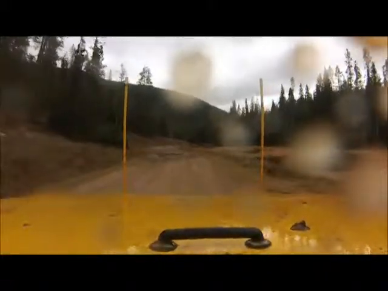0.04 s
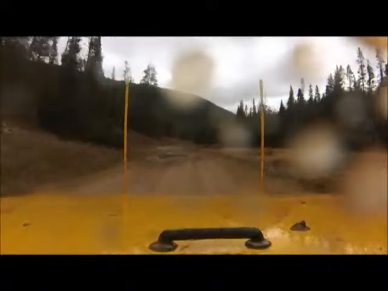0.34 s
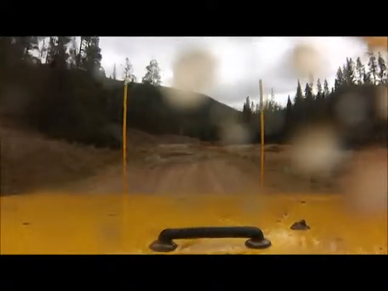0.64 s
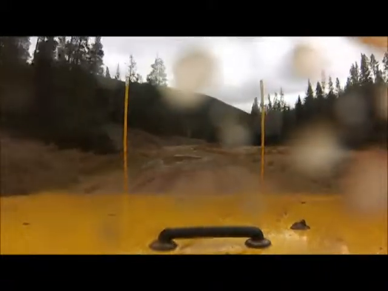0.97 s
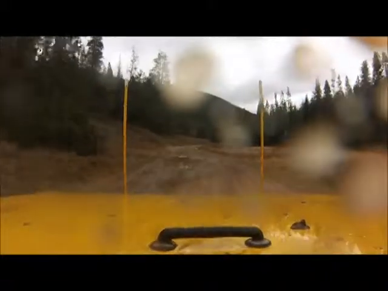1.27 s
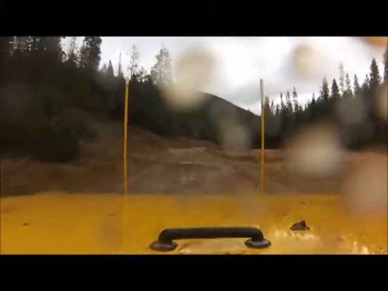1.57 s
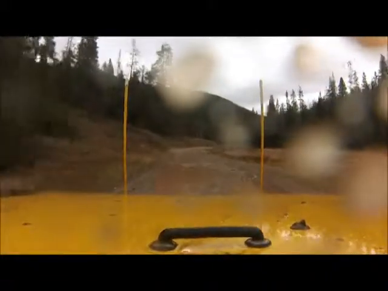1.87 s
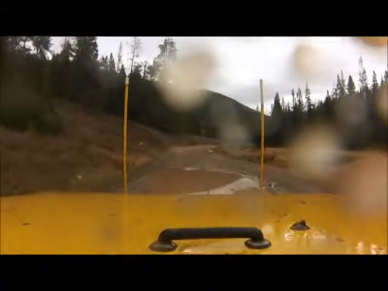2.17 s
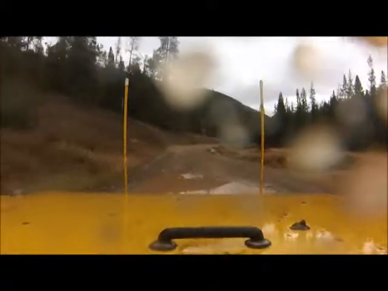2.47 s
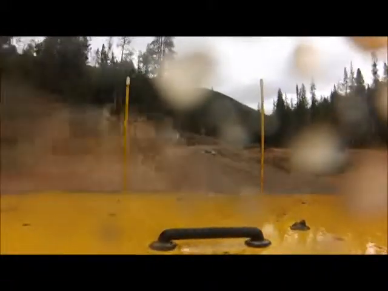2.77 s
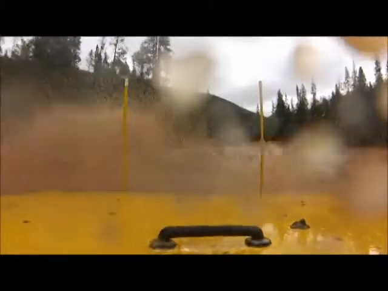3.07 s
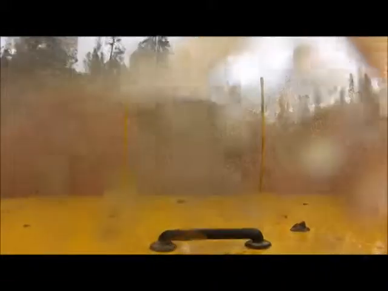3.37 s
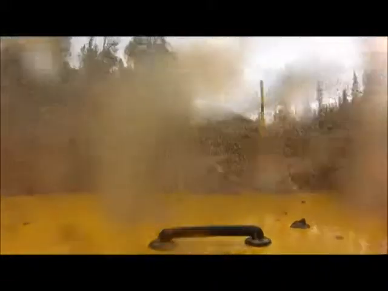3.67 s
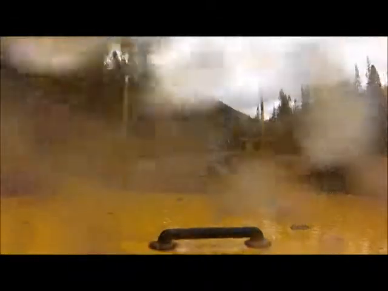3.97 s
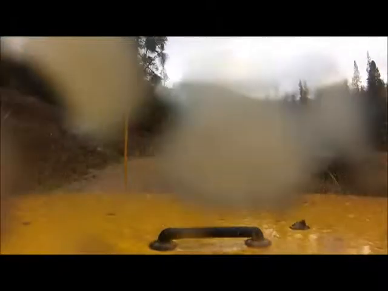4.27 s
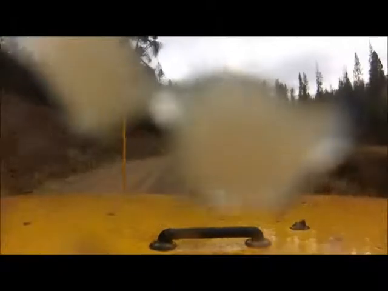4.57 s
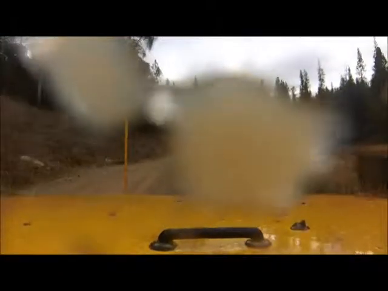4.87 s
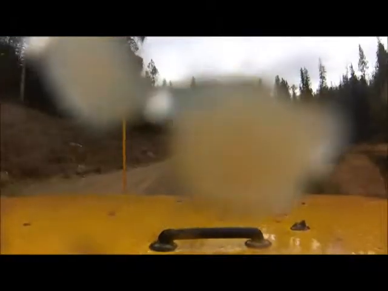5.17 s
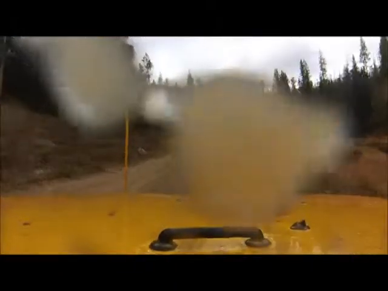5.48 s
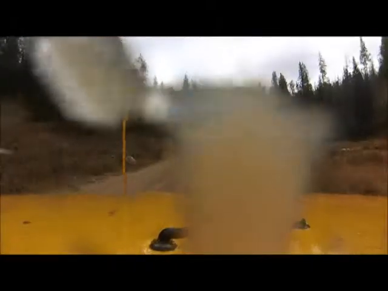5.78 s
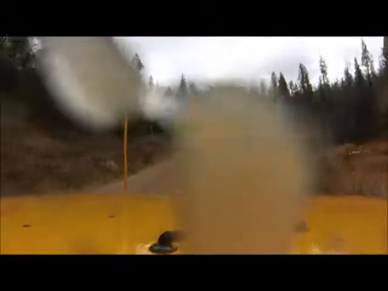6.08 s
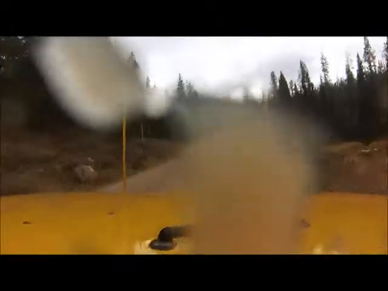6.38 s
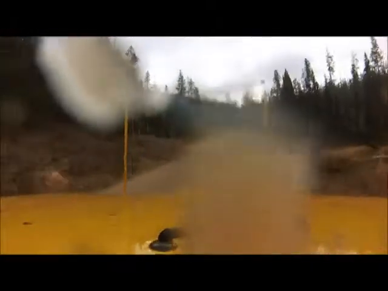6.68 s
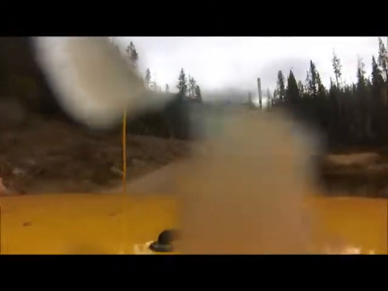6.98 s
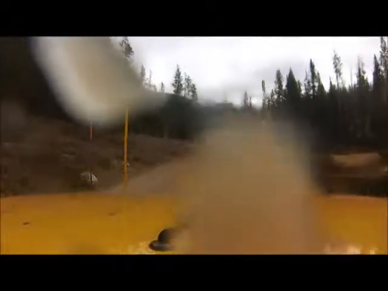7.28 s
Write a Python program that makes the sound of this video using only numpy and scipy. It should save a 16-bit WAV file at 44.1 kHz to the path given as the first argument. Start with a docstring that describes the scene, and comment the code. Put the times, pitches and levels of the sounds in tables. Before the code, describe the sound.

An off-road vehicle rumbles and rattles along a dirt road, with muddy water spraying and ticking right against the microphone.

```python
"""A wet dirt road, heard from a cased camera on the hood of an off-road vehicle driving through a puddle.
Right under the microphone the hood shakes at about 26 Hz, and a loose fitting knocks on it at the bumps.
Further off the engine drones under load, tyres rumble and crunch, and ruts make the body boom.
Closest of all, grit and drops tick on the hollow case, muddy spray washes over it and air buffets it."""
import sys
import numpy as np
from scipy import signal
from scipy.fft import rfft, irfft, next_fast_len
from scipy.io import wavfile
from scipy.ndimage import uniform_filter1d

SR = 44100
rng = np.random.default_rng(int(sys.argv[2]) if len(sys.argv) > 2 else 0)


def bounce(signal):
    """Save signal as a 16-bit WAV file at the path given by the first command-line argument."""
    frames = np.transpose(np.atleast_2d(signal))
    limited = np.clip(frames, -1, 1)
    pcm = np.round(limited * 32767).astype(np.int16)
    wavfile.write(sys.argv[1], SR, pcm)


N = 328093  # 7.44 s; table levels are relative, and each source sets its own gain


# The hood swinging right under the microphone: (time [s], rate [Hz], level [dB])
HOOD_SWING = [(0, 27.16, -15), (1.5, 27.19, -15.5), (2.7, 27.72, -15.5), (2.9, 25.41, -15.5),
              (3.4, 26.34, -14.5), (4.1, 26.37, -15.5), (4.35, 21.9, -20), (4.55, 24.05, -14.5),
              (5.35, 25.95, -14.5), (5.95, 24.63, -17), (6.2, 26.5, -14.5), (6.75, 25.05, -17),
              (7.44, 25.85, -15)]
def hood_shake(level_db=1.5, overtone_db=-33, rough_road_db=-41, calm_sway=0.04183, rough_sway=0.1682):
    """The hood swings lopsidedly on its lowest mode; rough ground upsets its pace and checks its swing."""
    ground = np.sqrt(gain_of(follow(ROAD_ROUGHNESS)) ** 2 + swells(ROAD_RUTS))
    upset = np.tanh(ground / gain_of(rough_road_db))
    hz = follow(HOOD_SWING) * (1 + (calm_sway + rough_sway * upset ** 2) * wander(12.46))
    dips_db = np.minimum((5 + 0.5 * upset) * np.maximum(wander(10.7), 0) ** 2, 6)  # brief, 6 dB at most
    angle = 2 * np.pi * np.cumsum(hz) / SR
    swing = np.sin(angle) + gain_of(overtone_db) * (np.cos(2 * angle) + np.sin(3 * angle))
    return np.sqrt(2) * gain_of(follow(HOOD_SWING, column=2) + level_db - dips_db) * swing


# The panel the camera sits on, its strong modes: (frequency [Hz], level [dB], t60 [s])
PANEL_MODES = [(443, -30, 0.084), (679, -9.5, 0.11), (748, -10.5, 0.13), (834, -7, 0.12), (960, -10, 0.19),
               (1153, -11, 0.19), (1335.6, 6, 0.056), (1442, 5, 0.061), (1488, -1.5, 0.08),
               (1603, 0, 0.084), (1621, -5.5, 0.036), (1908, 2, 0.037), (1940, -6, 0.08),
               (1985, -22, 0.046), (2390, -12, 0.019), (3200, -6.5, 0.04), (3650, -17.5, 0.11),
               (4850, -11, 0.028), (5380, -11, 0.052)]
# Its dense, weaker modes: (frequency [Hz], level [dB])
PANEL_RING = [(100, -41.5), (220, -6.5), (400, 1.5), (600, 1), (1000, 7.5), (1500, -4.5), (2300, 4),
              (2750, -10), (3400, -6), (4400, -18.5), (5400, -13.5), (6200, -25.5), (11000, -28.5),
              (16000, -38)]
def struck_hood(size, spread_db=2.2, detune_per_khz=.0065, ring_db=-6, ring_s=0.012, treble_s=0.0084):
    """The hood rings after a blow, its modes a little different in strength and pitch each time."""
    t, hz = np.arange(size) / SR, np.fft.rfftfreq(size, 1 / SR)
    modes = np.zeros(size)
    for mode_hz, db, t60 in PANEL_MODES:
        pitch = mode_hz * (1 + detune_per_khz * mode_hz / 1000 * rng.standard_normal())
        decay = gain_of(db + spread_db * rng.standard_normal() - 60 * t / t60)
        modes += decay * np.sin(2 * np.pi * pitch * t)
    dense = coloured(rng.standard_normal(size), PANEL_RING)
    treble = irfft(rfft(dense) * (hz > 6000), size)
    ring = (dense - treble) * np.exp(-t / ring_s) + 1.3 * treble * np.exp(-t / treble_s)
    # the direct wave arrives as a hard clack before the panel rings on
    rise = 1 - np.exp(-(t / 0.00048) ** 2)
    clack = 1 + 0.59 * np.exp(-t / 0.00069)
    return (unit_rms(modes) + gain_of(ring_db) * unit_rms(ring)) * rise * clack


def contact_force(size, chatter=0.47, chatter_s=0.017, chatter_per_s=900, graze=0.19, graze_s=.0035):
    """One edge of the fitting grazes the metal, the full blow lands, and a soft chatter follows."""
    t = np.arange(size) / SR
    force = rng.standard_normal(size) * (rng.random(size) < chatter_per_s / SR) * np.exp(-t / chatter_s)
    force *= chatter / (np.linalg.norm(force) + 1e-9)
    force = signal.sosfilt(signal.butter(2, 2600, fs=SR, output="sos"), force)
    force[0] = 1  # the blow
    force[-round(graze_s * rng.uniform(.7, 1.5) * SR)] = graze  # wraps round to just before the blow
    return force


def knock(hardness_db, clang_db, lead_s=.012, travel_s=0.00515, size=8192):
    """One knock travels through the hood to the microphone; the blow lands about lead_s into the sound."""
    hz = np.fft.rfftfreq(size, 1 / SR)
    spectrum = rfft(struck_hood(size)) * rfft(contact_force(size))
    # a harder contact is brighter; where it lands decides how much the upper modes clang
    colour_db = hardness_db * spectrum_db([(2400, 0.1), (3200, 1.0)], hz)
    colour_db += clang_db * spectrum_db([(1400, 0.061), (2000, 0.93), (2400, 0.97), (3200, 0.0)], hz)
    # bending waves carry the treble faster than the bass
    lag_turns = travel_s * (2 * np.sqrt(1400 * hz) - hz) + hz * lead_s
    sound = irfft(spectrum * gain_of(colour_db) * np.exp(-2j * np.pi * lag_turns), size)
    return sound / np.sqrt(uniform_filter1d(sound ** 2, size=100).max())


# The loose fitting, close by on the hood: (time [s], level [dB], hardness [dB], clang near 2.2 kHz [dB])
FITTING_KNOCKS = [(0.0179, -23, -2, -6), (0.1154, -33.5, -11, 1), (0.2009, -31, -9, -2),
                  (0.2464, -34, -13, -3), (0.302, -28, -7.5, -4.5), (0.404, -32.5, -8, -2),
                  (0.5162, -31, 1.5, 1), (0.6175, -30, -7.5, -2), (0.6869, -27.5, -4.5, -1),
                  (0.7767, -37.5, -1, -3), (0.8658, -38, -9, -9), (0.9537, -30.5, -5, 0),
                  (1.0455, -36.5, -11, -2), (1.1078, -34, -8, -3), (1.3127, -40.5, -9, 0),
                  (1.3658, -38.5, -15, -1), (1.925, -35, -9, 0), (1.9918, -28.5, -17, -7),
                  (2.0379, -32, -3.5, 0), (2.1634, -24, -8.5, -2), (2.2553, -37.5, -6, 1),
                  (2.3329, -36.5, -10, -5), (2.5135, -29.5, -4, -2), (2.601, -29.5, -11, -7),
                  (2.6369, -27.5, -4, 6), (2.7761, -29.5, -4, 4), (2.8566, -28.5, -1, -4),
                  (2.8935, -33, -7, -2), (2.9185, -34, -4, 0), (2.9401, -25, -5, -3), (2.9635, -34, -6, -2),
                  (3.076, -32.5, 11, 12), (3.2186, -36, 0.5, 1), (3.2913, -35, -2, 3),
                  (3.3992, -37, -1, -4), (3.4895, -38, -9, 1), (3.7033, -32.5, -3, -5),
                  (3.7753, -34, -4, -2), (3.8512, -35, -9, -10), (4.4229, -20.5, -0.5, -1.5),
                  (4.4353, -28.5, 2, 2), (4.504, -26, -2.5, 1), (4.6885, -32, -11, -9),
                  (4.7537, -25.5, -9, -5), (4.945, -41, -14, -8), (5.03, -40.5, -14, -8),
                  (5.153, -40, -3, -3), (5.4948, -33.5, -9, -4), (5.5542, -39, -9, 1),
                  (5.6042, -31, -8, -5), (5.6321, -15.5, 1, 9), (5.6508, -28, -11, -3),
                  (5.6896, -26.5, 0.5, 0), (5.7339, -26, -3, 6), (5.7713, -28.5, -6, 0),
                  (5.7979, -30, 1, 6), (5.9582, -29, -6, -2), (6.0466, -25, 2.5, 6), (6.0921, -30, -2, 1),
                  (6.2721, -38, -5, -4), (6.3245, -33.5, -1, 7), (6.3812, -36.5, 2.5, 2),
                  (6.4524, -37, 0.5, -5), (6.5299, -36, 1.5, 5), (6.6089, -34, -2, -3),
                  (6.6716, -29, 2.5, 2), (6.7435, -26, 1.5, 1), (6.78, -31, -4, -2),
                  (6.8257, -27.5, 3.5, 0), (6.9114, -28.5, -1, -3), (6.9939, -24, -2.5, 1.5),
                  (7.0195, -36, -3, -2), (7.0913, -31.5, -0.5, 4.5), (7.2343, -34.5, -12, -9),
                  (7.2543, -35.5, -3, 0.5), (7.3741, -40.5, 4, 1)]
# The body's dull answer from below: (frequency [Hz], level [dB])
THUD_SPECTRUM = [(100, -22.5), (165, -4), (210, 6), (250, -1.5), (320, -15), (480, -7.5), (700, -22),
                 (2000, -53)]
def rattle(level_db=-1, thud_db=-25, thud_share=0.54, thud_lag_s=.024, lead_s=.012, faint_taps=14):
    """The loose fitting knocks and the body thuds after it; faint chance taps fall between."""
    out = np.zeros(N)
    for s, db, hardness_db, clang_db in FITTING_KNOCKS:
        add(out, s - lead_s, gain_of(db + level_db) * knock(hardness_db, clang_db, lead_s))
        thud = body_thud(THUD_SPECTRUM, rise_s=0.0043, decay_s=0.031)
        add(out, s + thud_lag_s, gain_of(thud_share * db + thud_db) * thud)
    road_db = follow(ROAD_ROUGHNESS)
    for at in rng.integers(0, N, faint_taps):
        tap_db = road_db[at] + 2 * rng.standard_normal()
        add(out, at / SR, gain_of(tap_db) * knock(hardness_db=-4, clang_db=0))
    return out


def body_thud(spectrum, rise_s, decay_s):
    """The body answers a blow with a short burst of low noise."""
    t = np.arange(SR // 4) / SR
    envelope = np.exp(-t / decay_s) * (1 - np.exp(-t / rise_s))
    return coloured(rng.standard_normal(len(t)), spectrum) * envelope


# Hard jolts of the suspension, felt at the microphone: (time [s], level [dB])
SUSPENSION_JOLTS = [(0.681, -24), (2.166, -22.5), (2.9, -35), (3.72, -26), (4.457, -16.5), (5.654, -17),
                    (5.973, -17.5), (6.116, -20.5), (7.042, -14)]
def jolts(level_db=2, width_s=0.00533, thud_db=-13):
    """Each hard jolt is one short push of pressure in the case, and the body thuds after it."""
    out, widths = np.zeros(N), np.arange(-4, 4, 1 / (width_s * SR))
    push = (2 * widths ** 2 - 1) * np.exp(-widths ** 2)
    for s, db in SUSPENSION_JOLTS:
        add(out, s - len(push) / 2 / SR, gain_of(db + level_db) * push)
        thud = body_thud(RUMBLE_SPECTRUM, rise_s=0.0091, decay_s=0.018)
        add(out, s - width_s, gain_of(db + thud_db) * thud)
    return out


# The engine's load, heard through the hood: (time [s], level [dB])
ENGINE_LOAD = [(0, -27.5), (0.23, -51.5), (1.2, -48), (2.3, -41), (2.5, -53), (2.7, -35), (2.93, -36.5),
               (3.07, -43), (3.26, -31.5), (3.58, -42.5), (3.88, -45), (4.06, -38.5), (4.25, -50.5),
               (4.5, -46.5), (5.52, -43.5), (5.67, -31.5), (5.9, -31), (6.15, -42), (6.42, -32.5),
               (6.6, -42), (7.17, -41.5), (7.44, -32)]
# Its crankshaft: (time [s], rate [turns/s])
CRANK_RATE = [(0, 30.6), (1.5, 26.7), (2.7, 30.4), (2.9, 27.6), (3.25, 26.8), (4.1, 26.3), (4.6, 26.3),
              (5.62, 28.8), (5.74, 26.1), (5.86, 27.9), (5.98, 25.7), (6.8, 26.2), (7.44, 26)]
# The tones of its drone: (order [multiple of crank rate], level [dB])
ENGINE_ORDERS = [(2, -0.5), (3, -2), (4, -2), (5, -3.5), (6, -19), (7, -28), (8, -34)]
# Single orders swelling out: (time [s], order [multiple of crank rate], level [dB], half length [s])
ORDER_HUMS = [(2.724, 4, -35, 0.036), (2.901, 4, -35, .06), (3.35, 4, -41, 0.084), (3.5, 3, -45, 0.16),
              (4.06, 3, -43.5, 0.079), (5.686, 4, -31, 0.056), (5.859, 4, -30.5, 0.075),
              (6.8, 7, -46.5, 0.16), (7.163, 7, -45.5, .06)]
def engine(level_db=1.0, rut_db=-6, surge_db=0.76, jitter=.008, roughness=.33, waver_db=2.2):
    """Low crankshaft orders drone raggedly, louder in each rut; single orders swell into a clean hum."""
    angle = 2 * np.pi * np.cumsum(follow(CRANK_RATE) * (1 + jitter * wander(14))) / SR
    drone, hum = np.zeros(N), np.zeros(N)
    for order, db in ENGINE_ORDERS:
        tone = np.exp(1j * (order * angle + 2 * np.pi * rng.random()))
        ragged = 1 + roughness * (wander(13) + 1j * wander(28))
        drone += gain_of(db + waver_db * wander(5.7)) * (ragged * tone).real
        hum_power = swells([(s, hum_db, half_s) for s, k, hum_db, half_s in ORDER_HUMS if k == order])
        hum += np.sqrt(2 * hum_power) * tone.real
    load = np.sqrt(gain_of(follow(ENGINE_LOAD)) ** 2 + gain_of(rut_db) ** 2 * swells(ROAD_RUTS))
    return load * gain_of(level_db) * unit_rms(drone * gain_of(surge_db * wander(21))) + hum


# Roughness of the dirt road, a wheel's height below the hood: (time [s], level [dB])
ROAD_ROUGHNESS = [(0, -45), (0.45, -51), (0.9, -49.5), (1.6, -51.5), (2.05, -49), (2.46, -53),
                  (2.58, -43.5), (3.25, -47), (4.1, -53.5), (4.4, -43), (4.62, -51), (5.45, -48),
                  (5.72, -38), (6.08, -46.5), (6.23, -59), (6.85, -36.5), (7.15, -48), (7.44, -53)]
# Wet gravel down at the tread: (time [s], level [dB])
WET_GRAVEL = [(0, -47), (0.12, -59.5), (1.2, -60), (1.6, -57), (1.8, -51.5), (2.12, -50.5), (2.45, -55.5),
              (2.72, -43.5), (2.9, -44), (3.03, -49), (3.28, -45.5), (3.46, -56), (4.12, -51.5),
              (4.33, -36), (4.54, -55), (4.9, -51.5), (5.2, -64.5), (5.42, -52.5), (5.73, -45.5),
              (6.15, -57.5), (6.38, -55), (6.84, -51.5), (7.15, -61), (7.44, -56)]
# Rumble and crunch as they reach the microphone: (frequency [Hz], level [dB])
RUMBLE_SPECTRUM = [(30, 3), (60, 5), (100, -3.5), (165, 1), (195, 3), (240, 3), (275, -4.5), (310, -2),
                   (380, -6.5), (455, -4.5), (580, -12), (850, -12.5), (1500, -22), (5000, -78)]
CRUNCH_SPECTRUM = [(400, -24), (750, -6.5), (1130, -5), (1390, 1.5), (1510, 1), (1640, -2), (1790, -4),
                   (2120, -1.5), (2700, -17), (3400, -21), (4400, -30.5), (5400, -28), (6500, -39),
                   (16000, -44.5)]
def tyres(rumble_db=1, crunch_db=1, lumpy_db=3.5, clump_db=2, drum_db=-6, road_share=0.37):
    """Lumps and ruts rumble through the body; gravel crunches under the tread and drums the underside."""
    rumble = coloured(rng.standard_normal(N) * gain_of(lumpy_db * wander(30)), RUMBLE_SPECTRUM)
    road_db, gravel_db = follow(ROAD_ROUGHNESS), follow(WET_GRAVEL)
    ground = np.sqrt(gain_of(road_db + rumble_db) ** 2 + swells(ROAD_RUTS))
    underside = signal.butter(2, [290, 750], "band", fs=SR, output="sos")
    drumming = unit_rms(signal.sosfilt(underside, coloured(rng.standard_normal(N), RUMBLE_SPECTRUM)))
    drumming = unit_rms(signal.sosfilt(underside, drumming[::-1])[::-1])  # back again, for steeper edges
    drumming *= gain_of(drum_db + road_share * road_db + (1 - road_share) * gravel_db)
    stones = grains(per_s=4400, spread_db=1.5) * gain_of(clump_db * wander(46))
    crunch = coloured(stones, CRUNCH_SPECTRUM)
    return ground * rumble + drumming + gain_of(gravel_db + crunch_db) * crunch


# Ruts passing under the wheels: (time [s], level [dB], half length [s])
ROAD_RUTS = [(0.012, -31.5, 0.062), (0.283, -42, 0.016), (0.341, -37, 0.016), (0.558, -41.5, 0.016),
             (0.66, -38.5, 0.025), (0.825, -42, 0.016), (0.994, -41.5, 0.012), (1.093, -41.5, 0.023),
             (1.395, -53.5, 0.022), (2.018, -45.5, 0.044), (2.193, -40.5, 0.013), (2.567, -41.5, 0.028),
             (2.909, -31, 0.022), (3.283, -41.5, 0.073), (3.825, -44.5, .06), (4.36, -39.5, 0.018),
             (4.456, -31, 0.017), (4.774, -39.5, 0.025), (5.665, -32, 0.029), (6.09, -31, 0.037),
             (6.373, -40, 0.04), (6.728, -35, .02), (6.796, -29, 0.02), (6.862, -39.5, 0.012),
             (7.017, -34.5, 0.01)]
# Low resonances of the body beneath the camera: (frequency [Hz], level [dB])
BODY_RESONANCES = [(193, 0), (241, 2), (308, -5.5)]
def body_boom(level_db=-3, width_hz=22, depth_share=0.71, pivot_db=-40):
    """Each rut sets the body booming on its low resonances."""
    t, ringing = np.arange(N) / SR, np.zeros(N)
    for hz, db in BODY_RESONANCES:
        envelope = wander(width_hz / 2) + 1j * wander(width_hz / 2)
        ringing += gain_of(db) * (envelope * np.exp(2j * np.pi * hz * t)).real
    power = swells([(s, pivot_db + depth_share * (db - pivot_db), half_s) for s, db, half_s in ROAD_RUTS])
    return gain_of(level_db) * np.sqrt(power) * unit_rms(ringing)


# The fitting rubbing on the hood, close by: (frequency [Hz], level [dB])
SCRAPE_SPECTRUM = [(500, -32), (850, -13), (1000, 4), (1120, 7), (1280, -13), (1460, 0), (1720, -3),
                   (1900, -11), (2200, -9), (2700, -37), (8000, -40)]
def scrape(at_s=7.255, level_db=-41.5, half_s=0.03):
    """The loose fitting judders briefly across the metal."""
    judder = coloured(grains(per_s=1100, spread_db=2.5), SCRAPE_SPECTRUM)
    return np.sqrt(swells([(at_s, level_db, half_s)])) * judder


# Muddy water thrown at the case, right at the microphone: (time [s], level [dB])
MUD_SPRAY = [(0, -75.5), (1.1, -77.5), (1.5, -73), (2.2, -72.5), (2.55, -77), (3.3, -67.5), (3.58, -57),
             (3.69, -49.5), (3.87, -59), (4.05, -59.5), (4.27, -58.5), (4.37, -50), (4.51, -59.5),
             (4.6, -72.5), (5.4, -75), (5.55, -69.5), (6.05, -70), (6.3, -79), (7.44, -75)]
# Its fizz from inside the case: (frequency [Hz], level [dB])
SPRAY_SPECTRUM = [(500, -34), (1500, 12.5), (2300, 11), (3300, 5.5), (4400, 2.5), (5400, 2), (7200, 0.5),
                  (8200, -14.5), (9200, -14), (11500, -7), (13000, -11.5), (15500, -17)]
def spray(level_db=5, coarse_db=-4.5, merge_db=-57, clump_db=2.3):
    """Droplets fizz on the case in clumps; coarser ones spit through thin spray and merge in thick."""
    droplets = grains(per_s=6000, spread_db=5) * gain_of(clump_db * wander(260))
    coarse = splats(grains(per_s=130, spread_db=1.5), splat_s=0.00028)
    wet_db = follow(MUD_SPRAY)
    fizz = gain_of(wet_db) * coloured(droplets, SPRAY_SPECTRUM)
    spit = gain_of(np.minimum(wet_db, merge_db) + coarse_db) * coloured(coarse, TICK_SPECTRUM)
    return gain_of(level_db) * (fizz + spit)


# The largest drops and stones, landing right at the microphone: (time [s], level [dB])
CASE_TICKS = [(0.035, -44), (0.077, -57), (0.102, -55), (0.1361, -62), (0.1461, -52.5), (0.189, -63),
              (0.2254, -67), (0.2922, -58), (0.3466, -52), (0.3564, -62), (0.3665, -52), (0.3863, -55),
              (0.4266, -52.5), (0.463, -55), (0.5007, -62), (0.678, -55), (0.6985, -56), (0.7136, -51),
              (0.7332, -58), (0.8097, -54), (0.846, -57), (0.905, -52), (0.9288, -59), (1.2568, -55),
              (1.3549, -57), (1.3725, -58), (1.3952, -58), (1.4342, -55), (1.4534, -55), (1.6168, -53.5),
              (1.6364, -57), (1.7943, -55), (1.8121, -52), (1.8305, -53.5), (1.938, -55), (2.0583, -52),
              (2.076, -51), (2.17, -46), (2.187, -54), (2.2247, -49.5), (2.2672, -60), (2.286, -52.5),
              (2.3425, -49), (2.383, -55), (2.4, -55), (2.4178, -52), (2.588, -55), (2.634, -59),
              (2.7235, -56), (2.7417, -51), (2.9851, -51), (3.007, -49), (4.002, -50), (4.195, -58),
              (4.252, -47), (4.292, -47), (4.3213, -45), (4.3603, -56), (4.373, -39.5), (4.4214, -39),
              (4.479, -41.5), (4.5036, -48), (4.5709, -59), (4.8306, -46), (4.8378, -54), (4.8578, -55),
              (4.8759, -50), (4.919, -54.5), (5.028, -51), (5.0484, -49), (5.0696, -56), (5.09, -64),
              (5.1435, -60), (5.3223, -54), (5.3349, -50), (5.3395, -57), (5.3774, -59), (5.9762, -46),
              (6.104, -53), (6.119, -50), (6.1456, -53), (6.164, -54), (6.2675, -56), (6.802, -53),
              (6.8666, -52), (7.0225, -57), (7.0311, -55), (7.0402, -43.5), (7.0447, -48), (7.362, -56),
              (7.3769, -51)]
# A tick from inside the hollow case: (frequency [Hz], level [dB])
TICK_SPECTRUM = [(200, -4), (600, 8), (2000, -10.5), (2700, -1), (3600, -0.5), (4200, -5), (5600, -5),
                 (8500, -11), (11500, -13.5), (14500, -23), (16000, -28.5)]
def ticks():
    """Large drops and stones crack on the case one by one."""
    return case_hits(CASE_TICKS, TICK_SPECTRUM, level_db=23, length_s=0.0053, fizz=0.12)


# Single drops of muddy water on the case: (time [s], level [dB])
MUD_DROPS = [(3.1462, -56), (3.1792, -50), (3.2451, -46), (3.266, -49), (3.311, -49), (3.3647, -60),
             (3.39, -52), (3.42, -55), (3.44, -49), (3.5583, -51), (3.5902, -51), (3.6278, -50),
             (3.945, -51), (4.06, -50), (4.081, -52), (5.685, -57), (5.7162, -48), (5.7595, -53),
             (5.789, -52), (5.8209, -47), (5.829, -52), (5.8384, -48), (5.857, -47), (5.864, -52),
             (5.8751, -50), (5.893, -56), (6.25, -51), (6.3441, -47), (6.3692, -54), (6.3806, -49),
             (6.4, -49), (6.425, -55), (6.44, -50), (6.5212, -52), (6.5602, -54)]
# A drop bursting right at the microphone: (frequency [Hz], level [dB])
DROP_SPECTRUM = [(800, -28), (3000, -20.5), (4500, -17), (7000, -1), (8500, -9), (10500, -2.5),
                 (13000, -18.5), (16000, -22.5)]
def slaps():
    """Single drops burst brightly on the case."""
    return case_hits(MUD_DROPS, DROP_SPECTRUM, level_db=15, length_s=0.005, fizz=0.58)


def case_hits(rows, spectrum, level_db, length_s, fizz):
    """Each hit is a short crackle of force, heard through the case wall with the given spectrum."""
    hits = np.zeros(N)
    for s, db in rows:
        add(hits, s, gain_of(db + level_db) * crackle(length_s, fizz))
    return signal.oaconvolve(hits, click(spectrum))[:N]


def crackle(length_s, fizz=0.12, size=512, count=4):
    """A grain skips on the case: a few hard clicks within some milliseconds, energy 1."""
    span = int(np.clip(length_s * rng.uniform(.6, 1.4) * SR, 8, size))
    skips = np.zeros(size)
    skips[:span] = fizz * rng.standard_normal(span) / np.sqrt(span)
    skips[rng.integers(0, span, count)] += rng.choice([-1, 1], count) * rng.uniform(.3, 1, count)
    return skips / np.linalg.norm(skips)


# Showers of fine drops on the case: (time [s], level [dB], half length [s])
SHOWERS = [(3.42, -66.5, 0.17), (5.83, -65, 0.051), (6.41, -66.5, 0.08)]
def patter(spray_share_db=-14, floor_db=-94):
    """Fine drops patter brightly with the spray and in brief showers."""
    fine = coloured(splats(grains(per_s=590, spread_db=2.5), splat_s=0.00039), DROP_SPECTRUM)
    spray_power = gain_of(follow(MUD_SPRAY) + spray_share_db) ** 2
    return np.sqrt(swells(SHOWERS) + spray_power + gain_of(floor_db) ** 2) * fine


def splats(hits, splat_s):
    """Each impact bursts into a millisecond or so of noise."""
    age = np.arange(0, 8, 1 / (splat_s * SR))  # in units of splat_s
    return signal.oaconvolve(abs(hits), age * np.exp(1 - age))[:N] * rng.standard_normal(N)


def grit(swing, level_db=-70, skip_s=0.0028):
    """Loose grit hops on the case, mostly at the turning points of the hood's swing."""
    hops = grains(per_s=110, spread_db=2.5) * unit_rms(swing) ** 4
    skips = signal.oaconvolve(hops, crackle(skip_s))[:N] * rng.standard_normal(N)
    return gain_of(level_db) * coloured(skips, TICK_SPECTRUM)


# Hollow resonances of the case around the microphone: (frequency [Hz], width [Hz], level [dB])
CASE_RESONANCES = [(980, 61, -20), (1505, 130, -6), (1990, 250, -9)]
# Their faint singing along the road: (time [s], level [dB])
CASE_SINGING = [(0, -52), (1.1, -61.5), (1.6, -53.5), (1.9, -62.5), (4.95, -51.5), (5.25, -57), (6.2, -65),
                (7.44, -62)]
def singing_case(waver_db=6, drift=.01):
    """The running gear keeps the hollow case singing in a few narrow, wavering bands."""
    out, level_db = np.zeros(N), follow(CASE_SINGING) + waver_db * wander(4.9)
    for hz, width_hz, db in CASE_RESONANCES:
        angle = 2 * np.pi * np.cumsum(hz * (1 + drift * wander(3.7))) / SR
        band = wander(width_hz / 2) * np.cos(angle) + wander(width_hz / 2) * np.sin(angle)
        out += gain_of(db) * unit_rms(band)
    return gain_of(level_db) * out


# Air over the hood, a deep flutter at the microphone: (frequency [Hz], level [dB])
WIND_SPECTRUM = [(15, -44.5), (32, -1), (40, -16.5), (52, -10.5), (75, -36.5), (200, -87), (1000, -110)]
def wind(level_db=-36, gust_db=3):
    """Air buffets the case."""
    gusts = rng.standard_normal(N) * gain_of(gust_db * wander(14))
    return gain_of(level_db) * coloured(gusts, WIND_SPECTRUM)


def gain_of(db):
    """Decibels to a factor."""
    return 10 ** (np.asarray(db) / 20)


def unit_rms(x):
    """Scales to rms 1."""
    return x / np.sqrt(np.mean(x ** 2) + 1e-20)


def follow(rows, column=1):
    """One column of a timed table at every sample."""
    rows = np.asarray(rows)
    return np.interp(np.arange(N) / SR, rows[:, 0], rows[:, column])


def swells(rows):
    """Power of events (time [s], level [dB], half length [s]) that each rise and fall as a bell curve."""
    t = np.arange(N) / SR
    return sum(gain_of(db) ** 2 * np.exp(-((t - s) / half_s) ** 2) for s, db, half_s in rows)


def spectrum_db(points, hz):
    """A spectrum in dB at the given frequencies."""
    point_hz, db = np.transpose(points)
    return np.interp(np.log(hz + 1), np.log(point_hz + 1), db)


def coloured(x, points):
    """Gives x a spectrum, at rms 1."""
    hz = np.fft.rfftfreq(len(x), 1 / SR)
    return unit_rms(irfft(rfft(x) * gain_of(spectrum_db(points, hz)), len(x)))


def click(points, size=1024):
    """The shortest causal pulse with this spectrum, of energy 1."""
    log_gain = np.log(gain_of(spectrum_db(points, abs(np.fft.fftfreq(size, 1 / SR)))))
    pulse = np.fft.ifft(np.exp(np.conj(signal.hilbert(log_gain)))).real
    return pulse / np.linalg.norm(pulse)


def wander(rate_hz):
    """A random curve of rms 1 with changes up to about this rate."""
    size = next_fast_len(N)
    hz = np.fft.rfftfreq(size, 1 / SR)
    return unit_rms(irfft(rfft(rng.standard_normal(size)) / (1 + (hz / rate_hz) ** 4), size)[:N])


def grains(per_s, spread_db):
    """Random impacts, most small and a few large."""
    size = gain_of(spread_db * np.minimum(rng.exponential(1, N), 3))
    return size * rng.choice([-1, 1], N) * (rng.random(N) < per_s / SR)


def add(mix, s, sound):
    """Mixes a sound in at time s."""
    part = mix[max(round(s * SR), 0):][:len(sound)]
    part += sound[:len(part)]


def scene():
    """Vehicle, mud and air meet at the one microphone on the hood."""
    swing = hood_shake()
    vehicle = swing + rattle() + jolts() + engine() + tyres() + body_boom() + scrape()
    mud = spray() + ticks() + slaps() + patter() + grit(swing)
    return (vehicle + mud + singing_case() + wind())[None]


def record(dry):
    """The camera cuts off the treble above 15.7 kHz."""
    lowpass = signal.firwin(255, 15700, window=("kaiser", 9), fs=SR)
    return signal.oaconvolve(dry, lowpass[None], "same")


dry = scene()
out = record(dry)
bounce(out)
```